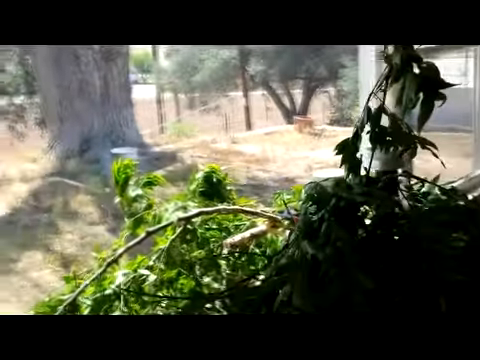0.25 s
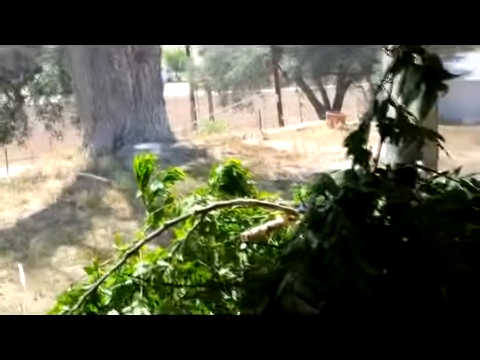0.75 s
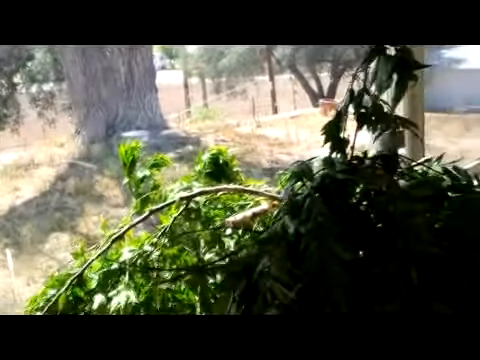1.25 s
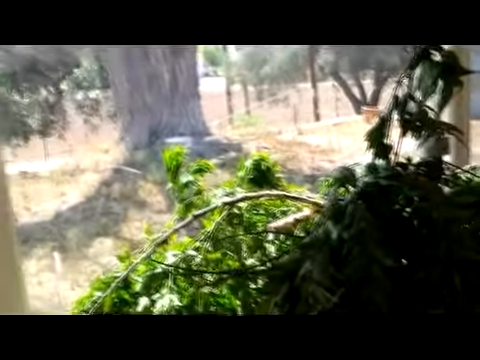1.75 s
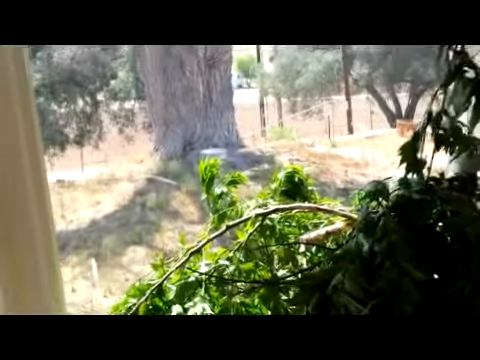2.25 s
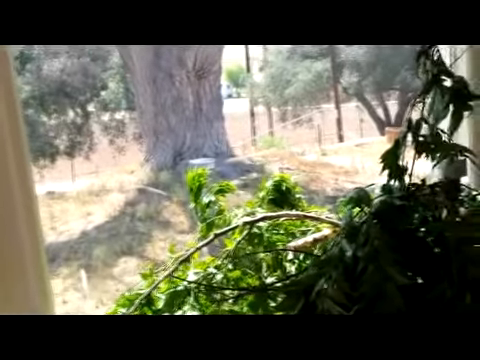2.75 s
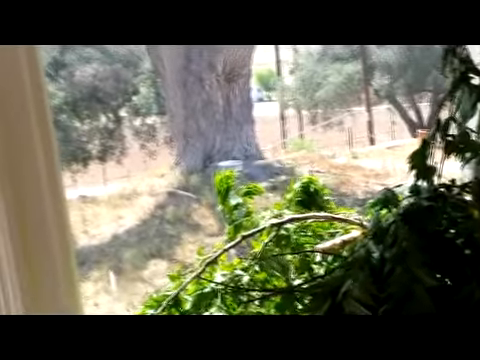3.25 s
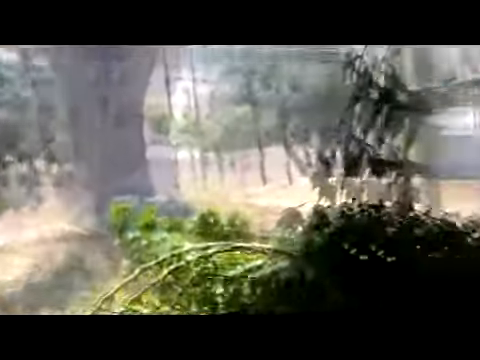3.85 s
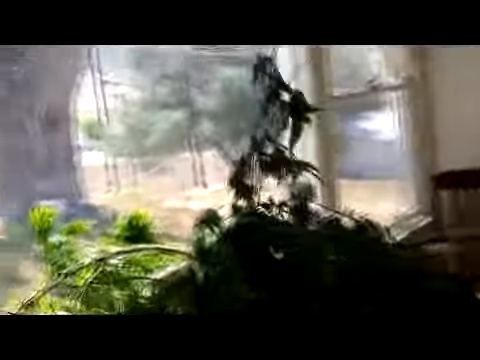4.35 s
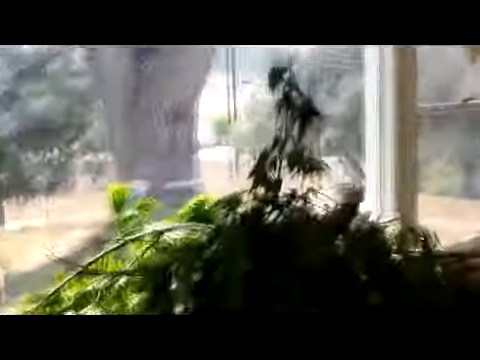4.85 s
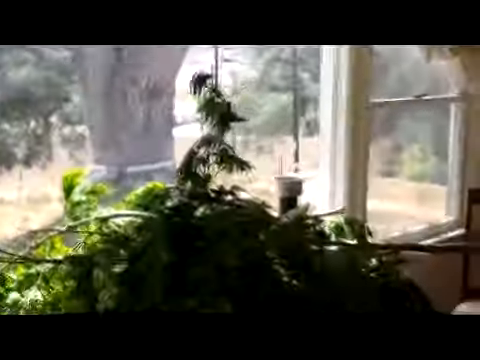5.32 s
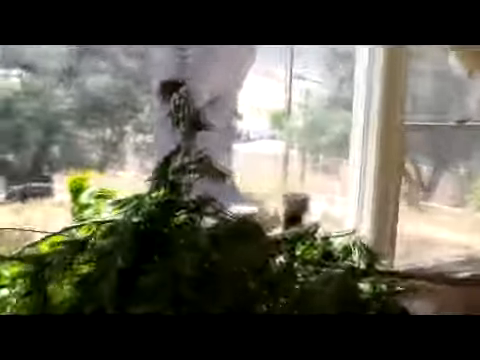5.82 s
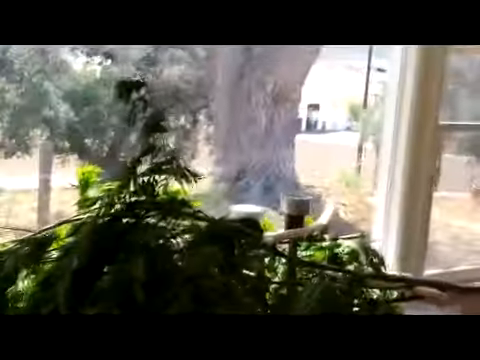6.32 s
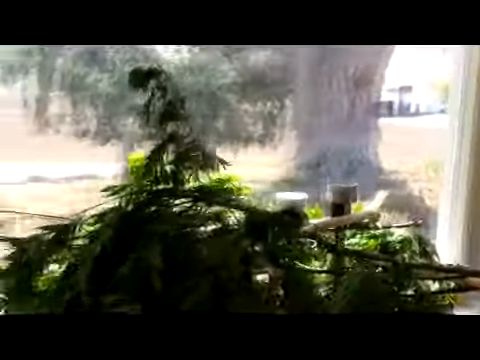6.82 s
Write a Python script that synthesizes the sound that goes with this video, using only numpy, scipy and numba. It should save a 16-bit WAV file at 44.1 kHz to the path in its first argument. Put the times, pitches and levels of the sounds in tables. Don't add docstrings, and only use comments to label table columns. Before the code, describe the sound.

Close hand-held stereo microphone with constant bright hiss and low floor rumble. Twigs splinter at uneven intervals, sharp and treble-heavy, slightly to the right, with about half a second of room echo. Faint creaks, knocks and rubbing skin surround them. Sharp case ticks precede a heavy bump; the hiss drops away and slowly recovers before a final loud crack and last left-side tick.

```python
import sys
import numpy as np
from scipy import signal
from scipy.fft import rfft, irfft, next_fast_len
from scipy.io import wavfile
from scipy.ndimage import uniform_filter1d
from numba import njit

SR = 44100
rng = np.random.default_rng(int(sys.argv[2]) if len(sys.argv) > 2 else 0)


def master(y):
    cut = np.clip(np.atleast_2d(y).T, -1, 1)
    pcm = np.round(cut * 32767)
    wavfile.write(sys.argv[1], SR, pcm.astype(np.int16))


def how_loud(loudness_db):
    steps = np.asarray(loudness_db, float) / 20
    return 10 ** steps


N = 312228


def gain_at(points, size):
    hz, db = np.transpose(points)
    return how_loud(np.interp(np.log(np.fft.rfftfreq(size, 1 / SR) + 1), np.log(hz), db))


# f/Hz, left minus right/dB
PORT_LEAN = [(300, 0.5), (1500, 0.5), (5000, 3.5), (8000, -1), (10000, -7.5), (15000, -5.5)]


def noise(points, alike_hz):
    size = next_fast_len(N, True)
    mid, side = rfft(rng.standard_normal((2, size)))
    side = side * np.minimum(np.fft.rfftfreq(size, 1 / SR) / alike_hz, 1)
    lean = np.sqrt(gain_at(PORT_LEAN, size))
    ports = np.array([(mid + side) * lean, (mid - side) / lean])
    pair = irfft(gain_at(points, size) * ports, size)[:, :N]
    return pair / np.sqrt(np.mean(pair ** 2))


def causal(points, size=1024):
    cepstrum = irfft(np.log(gain_at(points, size)), size)
    cepstrum[1:size // 2] *= 2
    cepstrum[size // 2 + 1:] = 0
    pulse = irfft(np.exp(rfft(cepstrum)), size)[:size // 2]
    return pulse / np.abs(pulse).max()


def walk(rate):
    k = int(SR / rate)
    held = np.repeat(rng.standard_normal(N // k + 1), k)
    return 3.7 * uniform_filter1d(uniform_filter1d(held, k), k)[:N]


def ring(hz, t60, size=4096):
    t = np.arange(size) / SR
    return np.sin(2 * np.pi * hz * t) * np.exp(-np.log(1000) * t / t60)


def add(track, s, sound):
    i = int(s * SR)
    track[..., i:i + sound.shape[-1]] += sound[..., :N - i]


def sides(pan_db):
    return how_loud(np.array([[pan_db], [-pan_db]]) / 2)


def swell(s, rise, fall):
    t = np.arange(N) / SR - s
    return np.minimum(rise * t, -fall * t)


# f/Hz, level/dB per Hz
HISS_COLOUR = [(24, -25), (60, -9.5), (230, -8.5), (300, -5), (420, -12), (900, -14.5), (1400, -15),
               (3300, -11.5), (4900, -8), (6600, -2), (8300, -4), (10000, -12), (14200, -18.5),
               (14700, -102)]


def hiss(gain_db):
    level_db = -45.5 + gain_db + .5 * walk(15)
    return how_loud(level_db) * noise(HISS_COLOUR, alike_hz=656)


# f/Hz, level/dB per Hz
JOIST_COLOUR = [(24, -32), (40, -3), (70, 0.5), (108, -1), (150, -7), (200, -41), (330, -120)]
# f/Hz, level/dB per Hz
BOARD_COLOUR = [(71, -28), (120, -4.5), (146, -1.5), (210, -2), (296, -0.5), (401, -15.5), (434, -13.5),
                (557, -22), (600, -17.5), (780, -28), (1320, -120)]
# t/s of the peak, joist level/dB, board level/dB, fall/dB per s
STEPS = [(0.01, -66, -55.5, 63), (0.3, -56, -58, 60), (0.59, -44.5, -44, 120), (0.7, -46, -44.5, 50),
         (1.05, -58, -49, 92), (1.36, -59, -53.5, 62), (1.7, -66, -64, 60), (2.02, -58, -61, 97),
         (2.319, -49.5, -40, 90), (3.41, -53, -64, 159), (3.53, -53, -51, 43), (3.73, -50.5, -55, 78),
         (4.449, -45, -42, 97), (4.66, -29, -36, 120), (5.0, -59.5, -78, 50), (5.4, -84, -66, 150),
         (5.77, -55, -54, 9), (6.03, -53, -52.5, 62), (6.3, -64, -45.5, 85), (6.57, -45, -45, 58),
         (6.889, -51, -48, 93), (7.07, -47, -55, 60)]


def floor(gain_db):
    cut_on, cut_off, fade = 6.7, 4.6, .04
    cut_times = [cut_on - fade, cut_on, cut_off, cut_off + fade]
    cut_db = -12 * np.interp(np.arange(N) / SR, cut_times, [0, 1, 1, 0])
    rest_db = np.array([[-62.5], [-64.5]])
    quicker = np.array([[1], [1.14]])
    level_db = rest_db + gain_db + cut_db
    for s, joist_db, board_db, fall in STEPS:
        step_db = np.array([[joist_db], [board_db]]) + swell(s, 314, fall) * quicker
        level_db = np.maximum(level_db, step_db)
    joists = how_loud(level_db[0] + 1.32 * walk(8.1)) * noise(JOIST_COLOUR, alike_hz=400)
    boards = how_loud(level_db[1] - 0.5 + 1.34 * walk(25)) * noise(BOARD_COLOUR, alike_hz=1220)
    return joists + boards


# f/Hz, t60/s
ROOM_T60 = [(300, 0.65), (1400, 0.4), (4000, 0.43), (8000, 0.3), (14000, 0.25)]


def room(size=16000):
    t, tail = np.arange(size) / SR, 0
    hz, t60 = np.transpose(ROOM_T60)
    for centre in 400 * 2. ** np.arange(6):
        edges = [centre / np.sqrt(2), centre * np.sqrt(2)]
        band = signal.butter(2, edges, "bandpass", fs=SR, output="sos")
        decay = np.exp(-np.log(1000) * t / np.interp(np.log(centre), np.log(hz), t60))
        tail = tail + decay * signal.sosfilt(band, rng.standard_normal((2, size)))
    tail = signal.sosfilt(signal.ellip(6, .5, 50, 14500, fs=SR, output="sos"), tail)
    bumps = np.tanh(uniform_filter1d(rng.standard_normal((2, size)), size=64) * 8)
    echoes = how_loud(4 * np.exp(-t / .05) * bumps)
    onset = 1 - np.exp(-t / 0.00093)
    near_walls = 1 + 0.46 * np.exp(-t / 0.033)
    return tail * echoes * onset * near_walls


# f/Hz, level/dB per Hz
CRACK_COLOUR = [(1940, -22.5), (3300, -16.5), (6360, -0.5), (6990, -2.5), (7800, -2), (11700, -10),
                (14500, -19.5), (15400, -62), (16900, -81)]
# f/Hz, level/dB per Hz
WOOD_COLOUR = [(600, -40), (1000, -3.5), (1500, -1.5), (2200, 7), (2900, 9.5), (4000, -14), (5500, -55.5)]
# f/Hz, level/dB per Hz
HOLLOW_COLOUR = [(250, -23.5), (550, -7), (900, -1.5), (1600, -4.5), (2600, -6), (3300, -10), (4500, -4.5),
                 (6000, -17.5)]
# t/s, peak level/dB, wood level re peak/dB, room level/dB, wood level in the room/dB
SNAPS = [(0.1957, -18, 5, -11.5, -9.5), (0.3394, -27, -3, -24, -12), (0.6366, -17, -9, -3.5, -5),
         (1.7205, -30, -17, -8.5, -38.5), (1.7953, -26.5, -21, -8, -39), (1.92, -27.5, -27, -19, -27),
         (2.1684, -18.5, -9, -8, -4), (2.2472, -17.5, -2, -5, -6), (3.145, -19, 5, -10, -30),
         (4.3812, -11.5, -43, -9.5, -11), (4.9604, -51.5, -18, 1.5, -7), (5.0731, -53, -2, 4, -29),
         (5.5102, -34.5, -9, -9, -33), (5.7404, -40, -27, -2, -10), (5.8421, -43.5, -2, 0, -5),
         (6.499, -22, -34, 2.5, -32), (6.505, -7.5, -31, -7, -13.5)]


def snaps():
    out = np.zeros((2, N))
    crack, wood, hollow = causal(CRACK_COLOUR), causal(WOOD_COLOUR), causal(HOLLOW_COLOUR)
    t = np.arange(600) / SR
    for s, peak_db, body_db, room_db, hollow_db in SNAPS:
        beak_hz = 6250 - 50 * max(peak_db + 13.5, -25)
        top = crack + 0.17 * ring(beak_hz, 0.0042, size=len(crack))
        chance = rng.standard_normal((3, len(t)))
        fibres = .3 * chance[:2] * how_loud(2 * chance[2]) * np.exp(-t / .002)
        fibres[0, 12] = fibres[1, 4] = 1
        direct = top + how_loud(body_db - 7) * wood
        sound = signal.fftconvolve(fibres, direct[None], axes=1)
        add(out, s, how_loud(peak_db + 2.5) * sides(-5.5) * sound / np.abs(sound).max())
        echoed = top + how_loud(hollow_db) * hollow + how_loud(body_db - 15) * wood
        tail = signal.fftconvolve(room(), echoed[None], axes=1)
        add(out, s, how_loud(peak_db + room_db - 13.5) * tail)
    return out


# f/Hz, level/dB, t60/s
LEFT_CASE = [(1110, -17, 0.032), (2690, 6, 0.0042), (5250, 4, 0.0077), (6550, 0.5, 0.011),
             (8840, -7, 0.0081), (12000, -10, 0.0042)]
# t/s, peak level/dB, softness of the contact/dB per kHz
LEFT_TICKS = [
    (0.318, -34, 0.5),
    (0.553, -22.5, 5.5),
    (1.159, -34.5, 4),
    (3.108, -7, -0.5),
    (3.439, -33.5, 7.5),
    (3.566, -35.5, 6),
    (3.719, -10.5, 0),
    (6.861, -6.5, 0),
]
# t/s, peak level/dB, pitch f/Hz, left minus right/dB, thud level re peak/dB
RIGHT_TICKS = [
    (3.7336, -4.5, 8500, 1.5, -43),
    (4.6682, -0.5, 7980, -5.5, -25.5),
    (4.9113, -15, 8500, 2, -23),
]


def ticks():
    out = np.zeros((2, N))
    i = np.arange(4096)
    highpass = signal.butter(3, 800, "highpass", fs=SR, output="sos")
    for s, peak_db, soft in LEFT_TICKS:
        near = 0
        for hz, db, t60 in LEFT_CASE:
            start = np.sign(4000 - hz) * how_loud(db - soft * hz / 1000)
            finger = np.exp(-(i * np.sqrt(hz) / 3500.0) ** 2)
            near = near + start * ring(hz, t60) * finger
        near = signal.sosfilt(highpass, near * (1 - np.exp(-i / 3.6)))
        leak = np.roll(ring(5600, 0.0064), 6) + 1.6 * np.roll(ring(8300, 0.016), 14)
        far = how_loud(-27.5 - 5.3 * soft) * (leak + 0.2 * ring(5600, 0.023))
        add(out, s + 0.0013, 2 * how_loud(peak_db) * np.array([near / np.abs(near).max(), far]))
    for s, peak_db, pitch_hz, pan_db, thud_db in RIGHT_TICKS:
        cavity = 1 - np.exp(-i / 7.2)
        near = cavity * (ring(pitch_hz, 0.0019) + 0.33 * ring(11600, 0.0021))
        near = near + how_loud(thud_db) * ring(1950, 0.0031)
        far = cavity * ring(.9 * pitch_hz, 0.0011) + how_loud(thud_db) * ring(2820, 0.0048)
        far = np.roll(far, 12)
        add(out, s + 0.00097, how_loud(peak_db + 10.5) * sides(pan_db) * np.array([far, near]))
    return signal.sosfilt(signal.butter(6, 14500, fs=SR, output="sos"), out)


def soften(x):
    return signal.sosfilt(signal.butter(4, 7000, fs=SR, output="sos"), x)


# t/s, length/s, pitch f/Hz, level/dB
CREAKS = [
    (0.398, 0.16, 2050, -59),
    (0.752, 0.26, 1990, -65),
    (5.992, 0.02, 362, -48),
    (6.354, 0.048, 754, -51),
    (7.02, 0.028, 1860, -67),
]


def creaks():
    out = np.zeros((2, N))
    for s, length, pitch_hz, level_db in CREAKS:
        t = np.arange(int(length * SR)) / SR
        tone = np.sin(np.pi * t / length) * np.sin(2 * np.pi * pitch_hz * t)
        add(out, s, how_loud(level_db) * tone * how_loud(2.6 * walk(57)[:len(t)]))
    return soften(out)


# t/s, peak level/dB, pitch f/Hz, t60/s, left minus right/dB
KNOCKS = [
    (0.4, -40, 102, 0.019, 1),
    (0.451, -23.5, 263, 0.033, -2),
    (0.555, -37.5, 277, 0.079, 14.5),
    (3.409, -54, 102, 0.068, 15),
    (4.119, -36.5, 165, 0.011, 17),
    (5.731, -52, 126, 0.15, -1),
    (6.259, -41, 340, 0.056, 3),
    (6.451, -56, 304, 0.033, 5),
]
# t/s, peak level/dB, pitch f/Hz, t60/s, left minus right/dB
BUMP = [
    (4.638, -15.5, 147, 0.051, 1.5),
    (4.654, -21.5, 121, 0.08, 0.68),
    (4.685, -16.5, 127, 0.07, 0),
]


def knocks():
    out = np.zeros((2, N))
    onset = 1 - np.exp(-np.arange(8192) / SR / 0.00068)
    edge = ring(614, 0.0084, size=8192) + ring(1370, 0.0038, size=8192)
    for s, peak_db, pitch_hz, t60, pan_db in KNOCKS + BUMP:
        edge_db = 4.5 - 2.5 * max(peak_db + 26.5, 0)
        blow = ring(pitch_hz, t60, size=8192) * onset + how_loud(edge_db) * edge
        add(out, s + 0.00295, how_loud(peak_db) * sides(pan_db) * blow)
    return soften(out)


@njit
def glide(x, hz, sharp):
    y, b, l, k = np.empty(len(x)), 0., 0., 1 / sharp
    for i in range(len(x)):
        g = np.tan(np.pi * hz[i] / SR)
        v = (b + g * (x[i] - l)) / (1 + g * (g + k))
        b, l, y[i] = 2 * v - b, l + 2 * g * v, k * v
    return y


# t/s of the peak, level/dB, rise/dB per s, fall/dB per s, centre f/Hz
RUBS = [
    (1.22, -48.5, 67, 160, 750),
    (3.567, -46.5, 1500, 118, 790),
    (4.638, -34.5, 298, 300, 600),
    (4.705, -40.5, 500, 500, 2760),
    (5.4, -60.5, 119, 230, 620),
    (5.85, -58.5, 95, 130, 1200),
    (6.115, -54.5, 400, 70, 860),
    (6.279, -46, 450, 145, 606),
    (6.46, -46.5, 296, 497, 1420),
]


def rubbing():
    level_db, centre_hz = np.full(N, -104.), np.full(N, 900.)
    for s, peak_db, rise, fall, grip_hz in RUBS:
        loss = swell(s, rise, fall)
        on = peak_db + loss > level_db
        level_db[on] = peak_db + loss[on]
        centre_hz[on] = grip_hz * (1 - 0.025 * loss[on])
    centre_hz = uniform_filter1d(np.clip(centre_hz, 200, 4000), size=300)
    grains = []
    for _ in range(2):
        broad = glide(rng.standard_normal(N), centre_hz, 0.8)
        grains.append(glide(broad, centre_hz, 1.6))
    mid, side = grains
    pair = np.array([mid + 0.46 * side, mid - 0.72 * side]) / np.sqrt(centre_hz / 1000)
    return how_loud(level_db + 12 + 0.97 * walk(70)) * pair


# t/s, level/dB
GAIN = [(2.2, 3.5), (2.5, 1), (3.5, 1), (4.5, 3), (4.67, -2.5), (5.17, -17.5), (5.46, -14.5), (5.78, -7.5),
        (5.92, -2), (6.05, -0.5), (6.35, 2.5)]


def gain_control():
    return np.interp(np.arange(N) / SR, *np.transpose(GAIN))


def scene():
    gain_db = gain_control()
    return hiss(gain_db) + floor(gain_db) + snaps() + ticks() + creaks() + knocks() + rubbing()


def roll_off(x):
    return signal.sosfilt(signal.butter(12, 16900, fs=SR, output="sos"), x)


def record(dry):
    over = np.clip(np.abs(dry).max(axis=0, keepdims=True) - .6, 0, None)
    release = np.concatenate([np.zeros(120), np.hanning(2800)[1400:]])
    held = signal.fftconvolve(over, release[None], axes=1)[:, :N]
    mix = np.clip(dry * how_loud(-8 * np.tanh(3.6 * held)), -.9, .9)
    return roll_off(mix)


dry = scene()
out = record(dry)
master(out)
```